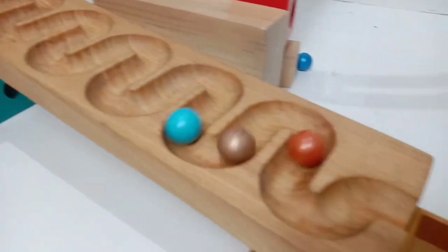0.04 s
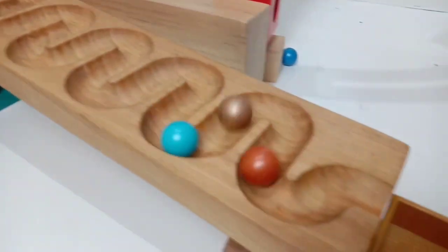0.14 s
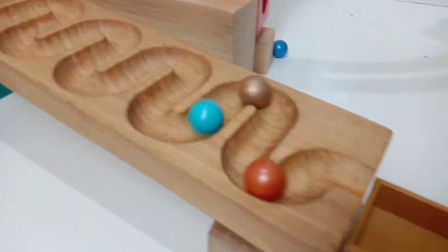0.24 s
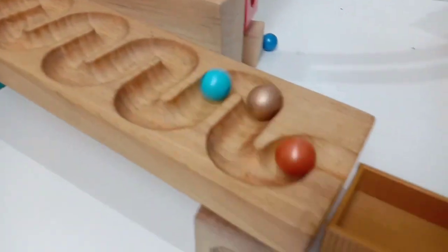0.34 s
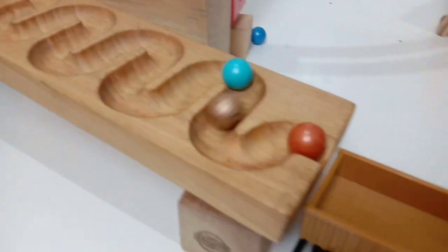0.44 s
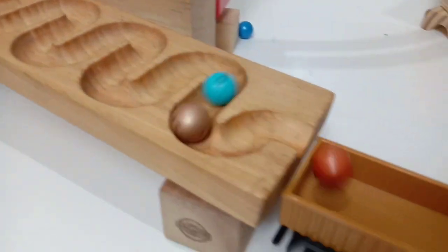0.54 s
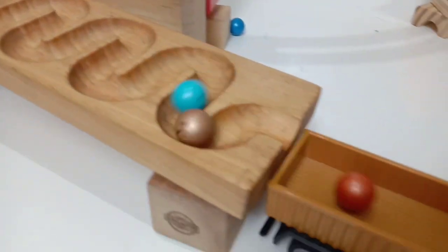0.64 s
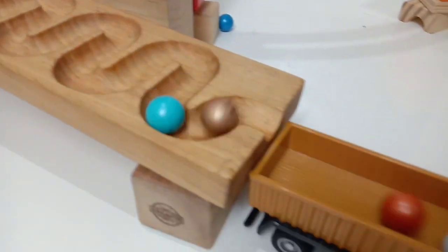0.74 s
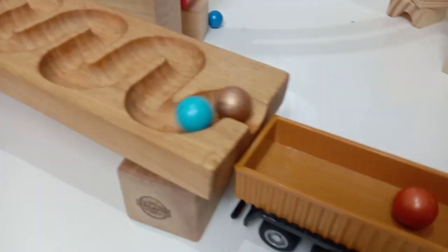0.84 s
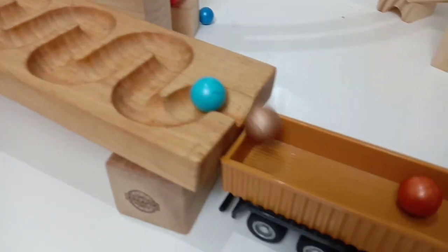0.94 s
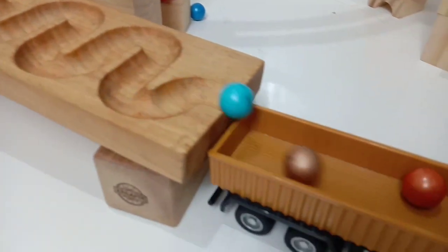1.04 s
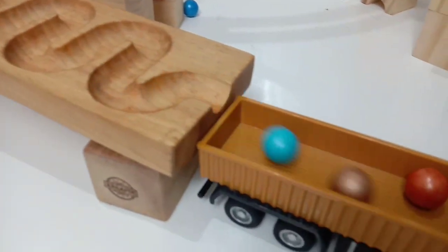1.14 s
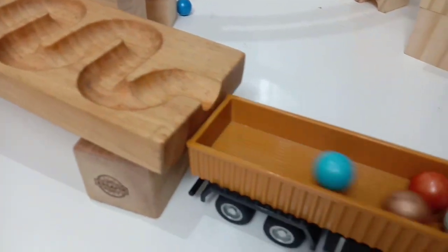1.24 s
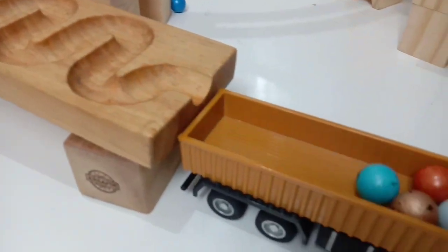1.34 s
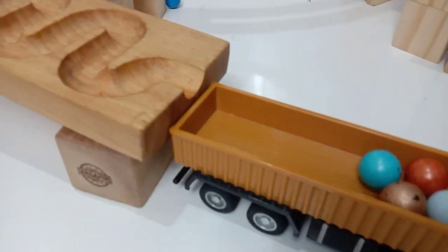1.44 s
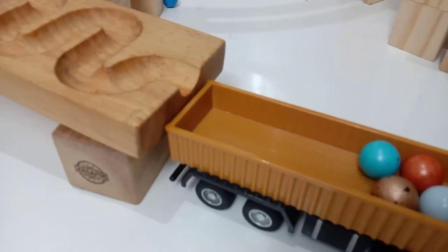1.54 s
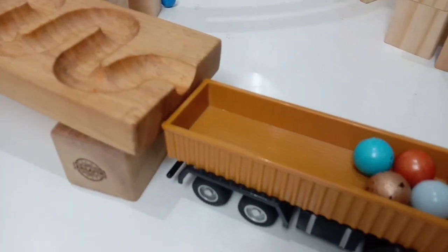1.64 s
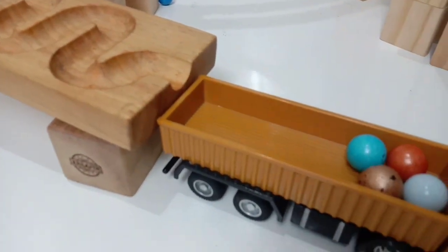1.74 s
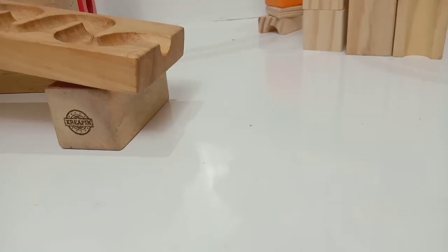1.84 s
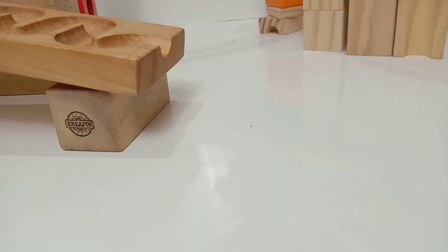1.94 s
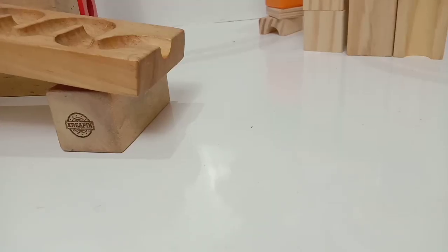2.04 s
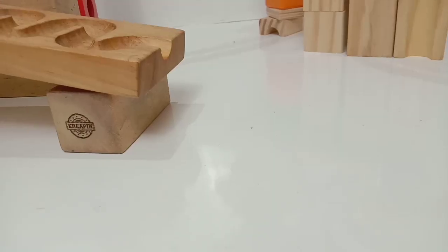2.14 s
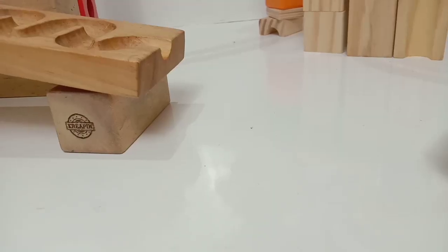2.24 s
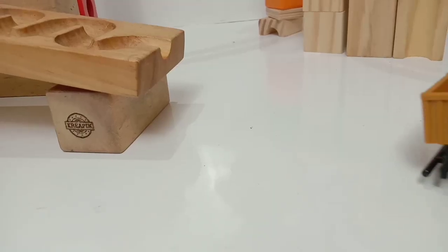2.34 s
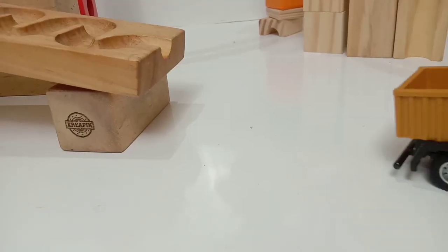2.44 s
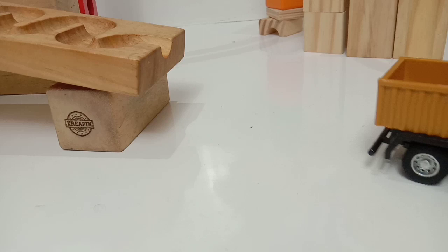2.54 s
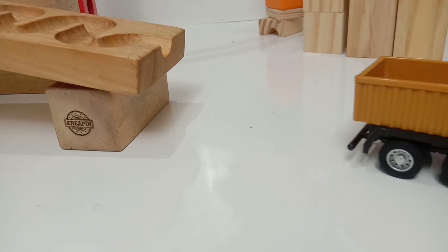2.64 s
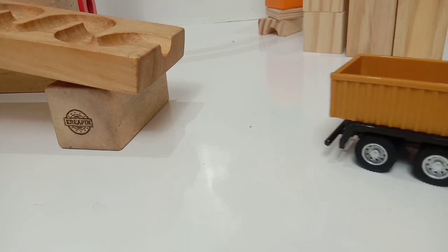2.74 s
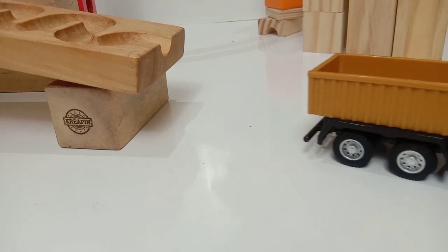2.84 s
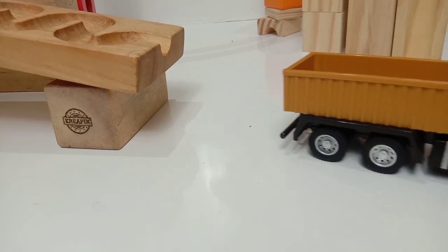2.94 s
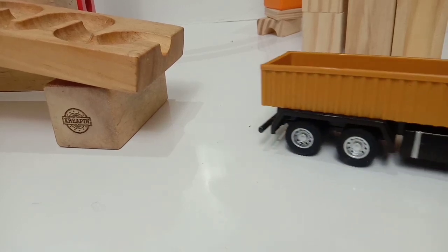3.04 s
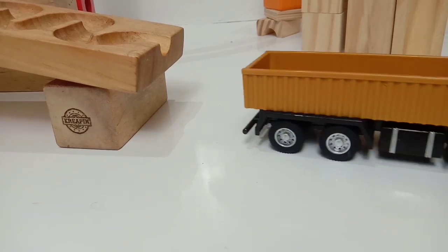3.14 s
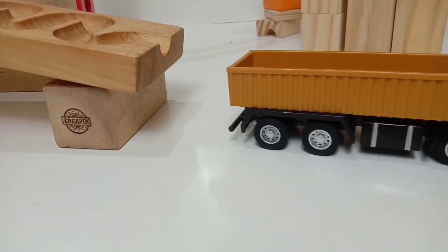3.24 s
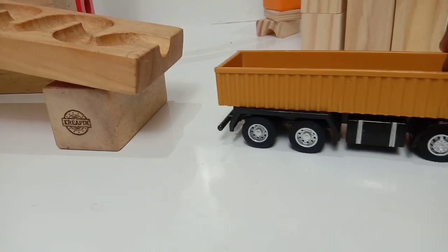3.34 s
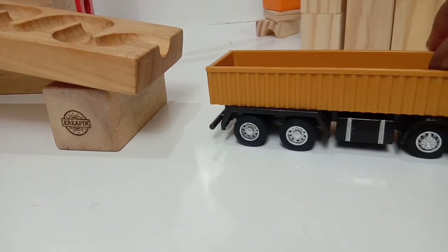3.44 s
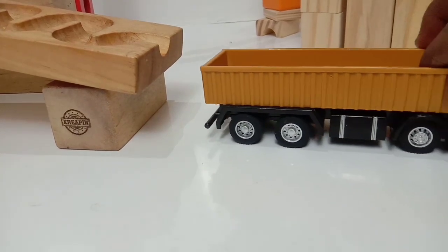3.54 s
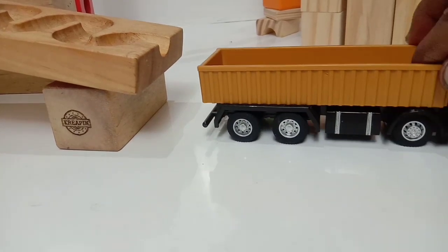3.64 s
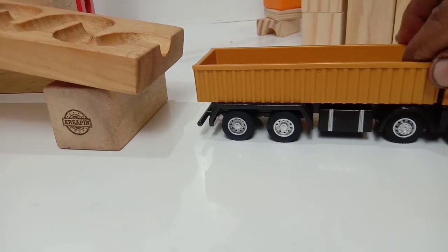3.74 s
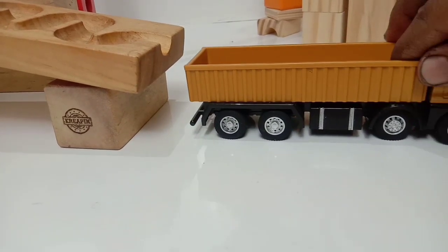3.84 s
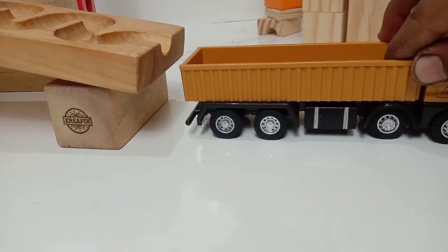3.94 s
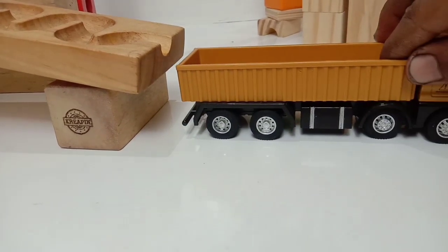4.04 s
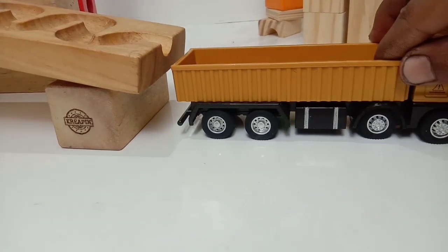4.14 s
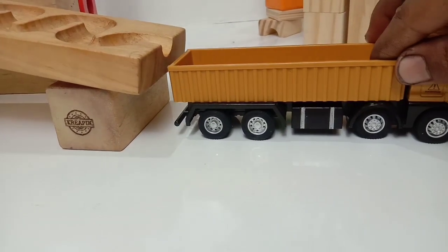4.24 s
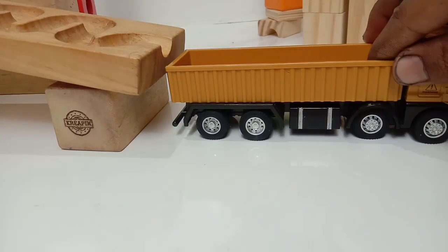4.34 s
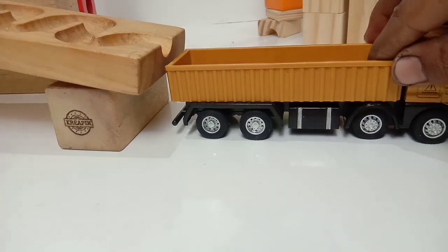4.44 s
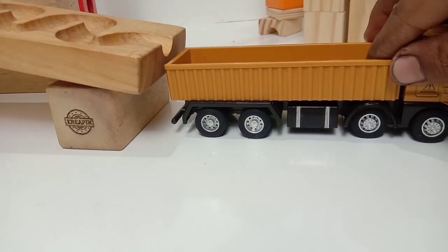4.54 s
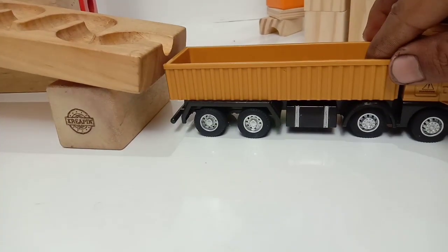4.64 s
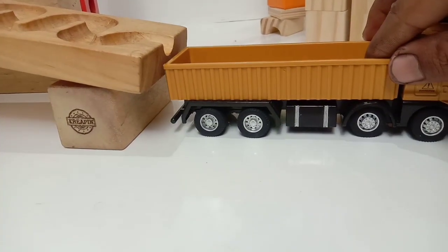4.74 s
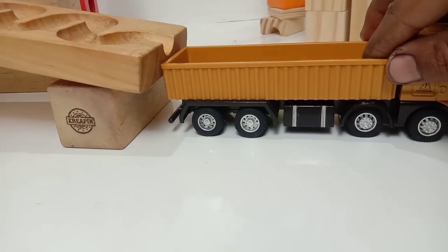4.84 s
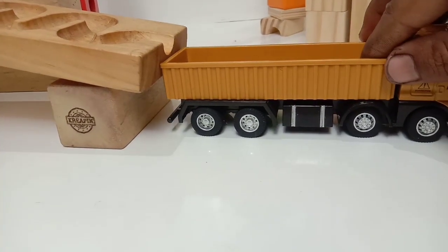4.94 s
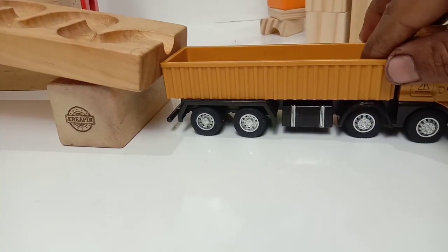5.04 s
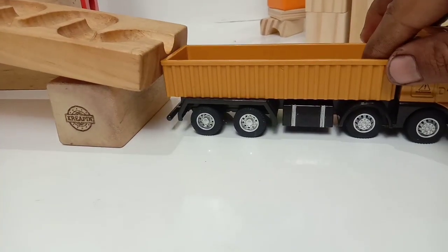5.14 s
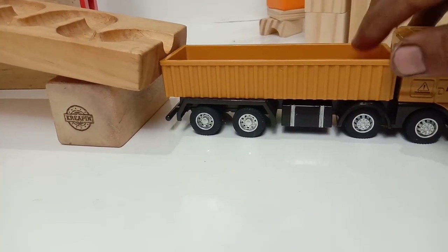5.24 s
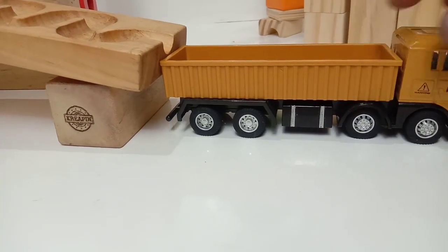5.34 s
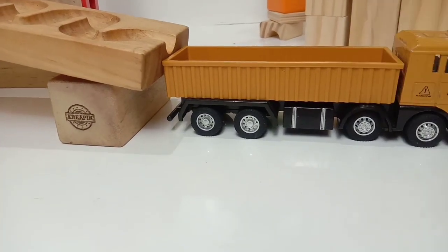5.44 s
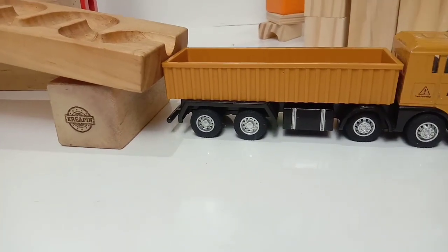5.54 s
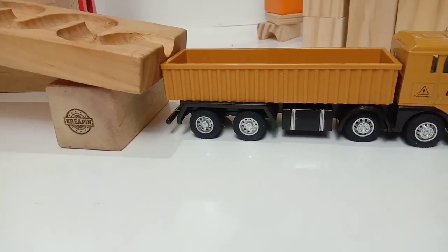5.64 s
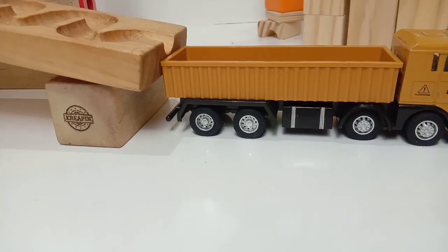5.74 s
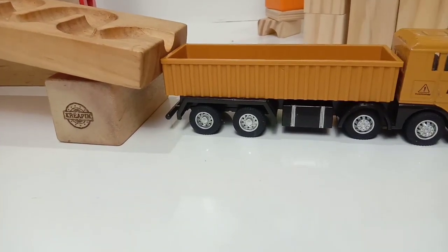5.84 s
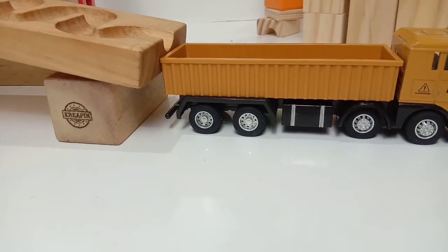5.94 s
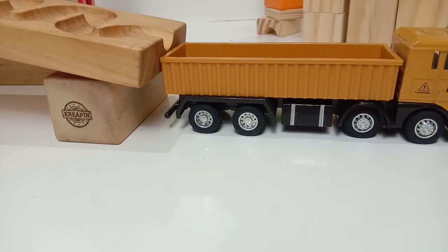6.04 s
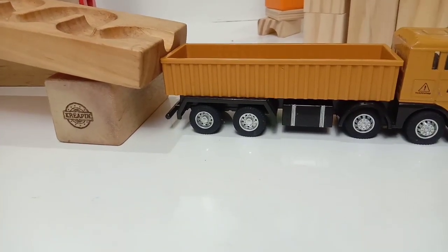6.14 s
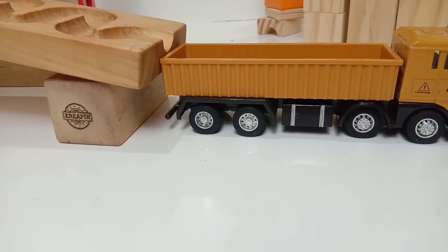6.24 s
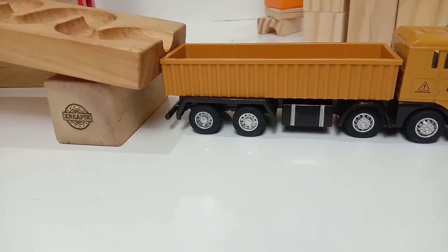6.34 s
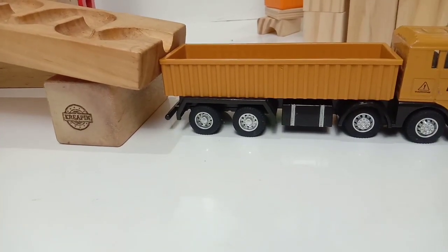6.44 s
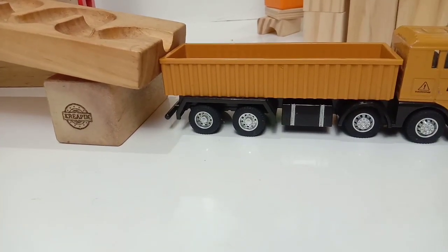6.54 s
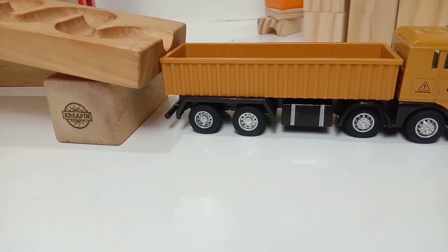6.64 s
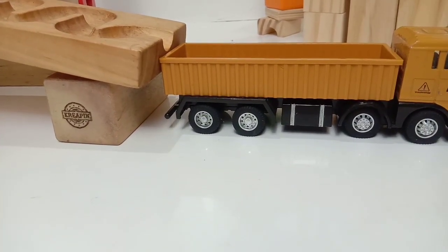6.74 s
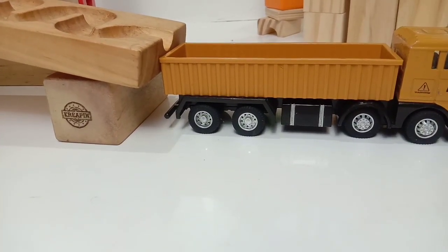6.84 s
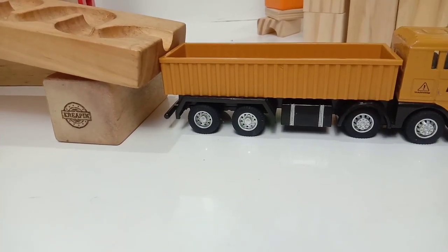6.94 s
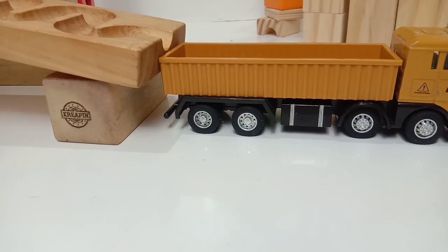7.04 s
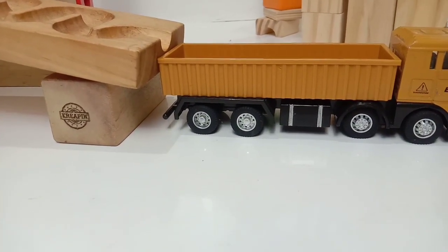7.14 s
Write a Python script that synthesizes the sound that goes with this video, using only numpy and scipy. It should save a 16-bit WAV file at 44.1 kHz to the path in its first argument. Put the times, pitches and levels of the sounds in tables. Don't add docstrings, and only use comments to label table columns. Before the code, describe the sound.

Close up in a small bare room, glass marbles rumble and knock down a grooved wooden track, then land with bright cracks in a plastic toy trailer and chatter along its bed. A short cut to silence follows. The empty toy truck is pushed over a hard table, axles rattling sharply, then sits with faint taps. Finally unseen marbles roll and clack together.

```python
import sys
import numpy as np
from scipy import signal
from scipy.fft import rfft, irfft, next_fast_len
from scipy.io import wavfile
from scipy.ndimage import map_coordinates

SR = 44100
rng = np.random.default_rng(int(sys.argv[2]) if len(sys.argv) > 2 else 0)


def transcribe(u):
    v = np.clip(np.atleast_2d(u).T, -1, 1)
    q = np.round(v * 32767).astype(np.int16)
    wavfile.write(sys.argv[1], SR, q)


def linear_from_db(decibels):
    return 10 ** (np.asarray(decibels, float) / 20)


N = 317520
SPAN = 16384

# f/Hz, density level/dB per Hz
AIR_SPECTRUM = [(15, -58), (25, -25), (177, -8), (214, -20.5), (399, -12.5), (445, -24), (687, -25),
                (1010, -22), (1360, -25), (1470, -28.5), (3510, -30), (15200, -45), (16500, -43)]
AIR_DB = -70.5
# f/Hz, t60/s
ROOM_T60 = [(150, 0.78), (1000, 0.29), (4000, 0.26), (8000, 0.23), (14000, 0.14)]

# f/Hz, width/Hz, level/dB
TABLE_MODES = [(86.7, 11, 0.5), (120, 7.3, 4.5), (181.2, 11, 6), (249.7, 31, -5.5), (57.74, 14, -22.5),
               (490, 63, -6.5)]
TRACK_MODES = [(279.3, 67, -5.5), (409, 23, 0), (512.8, 35, -8.5), (635.4, 120, -4), (740, 150, -2),
               (1240, 27, -0.5), (1560, 97, -1.5), (1900, 110, -10), (2860, 220, -11.5), (4150, 790, -24)]
TRAILER_MODES = [(402, 120, -14), (886, 240, -12), (1274, 160, 0.5), (1620, 620, -8), (2183, 330, -6)]
GLASS_MODES = [(2483, 380, 0.5), (2882, 1400, 0), (3600, 2000, -0.5), (4783, 710, 0.5), (4922, 220, 4),
               (5100, 430, -5), (5714, 270, -1), (6400, 240, 1.5), (7010, 600, 2), (7570, 980, 2.5),
               (8076, 360, -3), (8860, 1100, -19.5)]
# f/Hz, width/Hz, level/dB
SHEEN_MODES = [(9710, 610, 5), (10830, 390, 1), (11900, 910, -5.5), (13600, 3200, -18)]
# f/Hz, width/Hz, level/dB
PING_MODES = [(1240, 9.7, -13), (1650, 11, -0.5), (2200, 9.3, -2.5), (2885, 43, -12), (3505, 17, -5),
              (4530, 28, -4.5), (6156, 140, -0.5), (7120, 37, 3.5)]
# f/Hz, width/Hz, level/dB
AXLE_MODES = [(1240, 54, -1.5), (2700, 51, -7), (3650, 280, -9.5), (4500, 57, -2), (4370, 24, -4),
              (5170, 150, -2), (5960, 52, -4), (6340, 62, -10.5), (6760, 86, -5), (7800, 110, -8)]
# f/Hz, width/Hz, level/dB
SKID_MODES = [(4600, 160, -1.5), (6000, 250, 0), (7300, 260, 2.5), (8400, 770, -4), (9000, 180, -3.5),
              (9600, 330, -5), (11800, 200, -8), (14410, 900, -15.5)]
# f/Hz, width/Hz, level/dB
HOLLOW_MODE = (350, 15, -9)
# f/Hz, width/Hz, level/dB
PORT_MODE = (15250, 600, 11)
MARBLE_HZ, MARBLE_WIDTH_HZ = 6910, 370

# t/s, level/dB of each of the three modes, t60/s
TABLE_SWINGS = [(0.0, -28, -34, -28, 0.35), (0.29, -61, -52, -38.5, 1), (0.619, -34, -26, -35, 0.39),
                (0.988, -32, -29.5, -30.5, 0.69), (1.12, -44, -39, -35, 1), (1.302, -46, -47, -48, 0.41),
                (1.549, -55, -54.5, -66, 0.33), (1.93, -51.5, -52, -62, 1), (2.226, -43, -40, -52, 0.23),
                (2.365, -44, -48, -38, 0.74), (2.514, -41, -37.5, -50.5, 0.57), (2.719, -61, -50.5, -64, 1),
                (2.97, -59, -62, -50, 0.48), (3.132, -56, -46.5, -33.5, 0.37), (3.2, -48, -39.5, -55, 0.47),
                (5.251, -65.5, -58, -47, 0.38), (5.636, -48, -45, -43, 0.32),
                (5.7, -53.5, -51.5, -47, 0.33), (5.822, -61, -50.5, -65.5, 0.7),
                (6.85, -67.5, -60.5, -65.5, 0.61), (7.04, -66, -64, -57.5, 0.28)]
SWING_MODES_HZ = (84.7, 111.94, 178)
SWING_RISE_S = 0.015

# t/s, rumble level/dB, fade/dB per s, wood over rumble/dB
TABLE_JOLTS = [(1.97, -46.5, 86, -20), (2.25, -47, 100, -3), (2.39, -36.5, 120, 2.5), (2.54, -39, 118, 0),
               (2.76, -63, 20, -25), (3.172, -40, 125, -0.5), (3.74, -59.5, 70, -12),
               (4.2, -65, 67.5, -9.5), (4.89, -73, 142, 4), (5.288, -53.5, 169, -18),
               (5.651, -50.5, 55.5, -30), (6.2, -58.5, 7.5, -13.5), (6.87, -54, 19.5, -22)]
JOLT_RISE_DB_PER_S = 233.5
# t/s of greatest speed, rumble level/dB, chatter over rumble/dB
MARBLE_RUNS = [
    (0.0, -30.5, 8),
    (0.169, -48, 3),
    (0.33, -37, 3.5),
    (0.675, -33.5, 4),
    (1.03, -36.5, 9),
    (1.178, -32.5, 5.5),
    (1.361, -47, 10.5),
]
BED_RISE_DB_PER_S, BED_FADE_DB_PER_S, CHATTER_STEEPER = 147, 119.5, 1.3
# t/s, level/dB
GROOVE_EFFORT = [
    (0, -29.5),
    (.204, -37.5),
    (.36, -34.5),
    (.526, -49),
    (.676, -32.5),
    (.962, -46),
    (1.03, -39.5),
    (1.178, -43),
    (1.4, -55),
]
# t/s, level/dB
PUSH_EFFORT = [
    (1.98, -103),
    (2.09, -39.5),
    (2.19, -59),
    (2.34, -37.5),
    (2.67, -49.5),
    (3.17, -36.5),
    (3.29, -62),
    (3.74, -66),
    (3.97, -76),
]
# t/s, level/dB
UNSEEN_EFFORT = [
    (6.05, -90.5),
    (6.24, -76.5),
    (6.457, -42),
    (6.615, -39.5),
    (6.723, -54.5),
    (6.871, -47.5),
    (7.03, -76),
    (7.1, -100),
]
WHEELS_WOOD_DB, UNSEEN_WOOD_DB, REST_WOOD_DB, REST_TABLE_DB = -15, -2.5, -81.5, -66.5
WHEELS_CORNER_HZ = 7240

# t/s, level/dB
SKID_EFFORT = [
    (6.74, -93),
    (6.775, -68.5),
    (7.041, -55),
    (7.055, -69.5),
    (7.1, -83.5),
]
# t/s, peak level/dB, ringing f/Hz, t60/s
DULL_KNOCKS = [(0.051, -28, 1640, 0.19), (0.081, -19.5, 695, 0.03), (0.084, -20, 2750, .04),
               (0.227, -28, 740, .04), (0.327, -21.5, 1647, 0.046), (0.372, -18, 740, .06),
               (0.385, -30, 1610, .03), (0.486, -25, 740, 0.099), (4.916, -46, 1250, 0.022),
               (4.927, -44.5, 1150, .04), (5.086, -49.5, 1140, 0.13), (0.173, -25, 327, 0.5),
               (0.316, -16, 760, 0.26), (0.36, -16, 725, 0.13), (0.415, -14, 690, 0.076),
               (0.428, -10, 740, 0.059), (0.689, -17, 804, 0.029), (0.738, -35, 1650, 0.07),
               (0.768, -23, 665, 0.27), (0.798, -15.5, 710, 0.14), (0.867, -14, 763, 0.045),
               (0.893, -17, 740, 0.13), (1.522, -35.5, 414, 0.032), (1.70, -59, 489, 0.52),
               (2.211, -29.5, 1260, 0.18), (2.339, -27, 1520, 0.024), (3.688, -43.5, 390, 0.43),
               (3.917, -48, 1590, 0.074), (4.11, -62, 450, .3), (4.149, -59.5, 740, .3),
               (4.21, -61, 700, 0.21), (4.876, -44, 261, 0.098), (4.884, -41.5, 1213, 0.1),
               (5.271, -52, 1240, .04), (5.636, -30, 160, 0.15), (5.64, -39.5, 297, 0.24),
               (5.658, -46, 883, 0.053), (5.705, -36.5, 576, 0.077), (5.987, -49.5, 352, 0.099),
               (6.133, -46.5, 1290, 0.14), (6.154, -33, 1310, 0.18), (6.574, -33, 1290, 0.071),
               (7.004, -27.5, 302, 0.068), (7.006, -35.5, 582, .1), (7.03, -36, 219, 0.15)]

# t/s, peak level/dB, brightest mode f/Hz, knock level/dB re peak
TRAILER_TAPS = [
    (4.8686, -45, 4130, -5),
    (4.901, -38.5, 4180, 3),
    (5.1069, -47.5, 2200, -2.5),
    (5.277, -62.5, 4190, -2),
    (5.1887, -48.5, 2146, -14),
    (5.35, -58, 2090, -14.5),
    (6.1591, -31, 4340, 0),
]
HAND_CONTACTS = [
    (4.387, -60.5, 1884, -8),
    (4.488, -60, 5570, -15.5),
    (4.5539, -53, 3780, -6.5),
    (4.7617, -48, 7130, -3.5),
    (4.8683, -40, 7460, -8.5),
    (5.0939, -58, 2600, -6),
    (5.628, -47.5, 2180, -32),
    (5.6736, -47.5, 7200, -22),
]
TRUNDLE_CONTACTS = [(2.690, -40, 6000, -16), (2.7125, -59.5, 5180, -10), (2.9135, -48, 5270, -35),
                    (2.962, -41.5, 3700, -9), (3.0672, -41, 2100, -11), (2.7462, -37.5, 5500, -7.5),
                    (2.7677, -44, 3200, 1), (2.8566, -37, 3400, -2), (2.8814, -39.5, 5070, 0.5),
                    (2.9402, -40, 6750, -2), (2.9888, -40.5, 3570, -2), (3.0149, -30.5, 2050, -1),
                    (3.0886, -39, 2120, -18), (3.1206, -16.5, 7230, -6), (3.1382, -25.5, 6020, 9.5),
                    (3.1597, -24.5, 4160, 1.5), (3.1929, -28.5, 6440, 0), (3.2306, -33.5, 6700, 5),
                    (3.258, -28, 6950, -3), (3.5142, -42, 3390, 3.5), (3.5388, -35, 7500, -1),
                    (3.5514, -34.5, 3653, -4.5), (3.6005, -32, 3310, 0), (3.6095, -25.5, 3600, 1),
                    (3.754, -46, 6170, -28.5), (3.768, -28.5, 3560, -2.5)]
PUSH_BUMPS = [(1.924, -16, 3430, -14), (1.9515, -34.5, 4040, 0.5), (1.9574, -24, 5130, -7),
              (1.9799, -27.5, 3590, -3.5), (1.9904, -28, 4800, -16.5), (2.0153, -39.5, 4580, -3.5),
              (2.0351, -34.5, 4446, -12.5), (2.0685, -31.5, 8130, -23), (2.0929, -38.5, 3458, -13.5),
              (2.151, -36.5, 3700, -17), (2.1801, -27.5, 5620, -28.5), (2.218, -19.5, 7243, -11),
              (2.2199, -8, 6260, -8.5), (2.362, -12, 7800, -23.5), (2.3674, -15.5, 7390, -7),
              (2.3774, -17, 4680, -3), (2.397, -31, 5622, -11), (2.4061, -17.5, 3257, 0.5),
              (2.4697, -34, 3670, 3.5), (2.4975, -33, 2506, -14.5), (2.5114, -7, 7330, -4),
              (2.5451, -20, 4120, -5.5)]
MARBLE_CLACKS = [(6.2788, -36.5, 6200, 2.5), (6.2929, -22.5, 5100, 3.5), (6.318, -46.5, 2350, 19.5),
                 (6.3493, -20.5, 4600, -7), (6.3624, -24, 5960, -0.5), (6.3804, -18, 4600, -6.5),
                 (6.4358, -6.5, 5960, -16), (6.4461, -17.5, 6200, -8), (6.4677, -7.5, 5925, -11.5),
                 (6.4862, -6, 6930, -9), (6.5026, -10.5, 5675, -6), (6.537, -5, 6400, -14),
                 (6.5756, -20, 3302, -0.5), (6.616, -14, 7460, -13.5), (6.7072, -37, 2500, 0),
                 (6.7225, -36, 2300, -6), (6.797, -16.5, 5980, -2.5), (6.8075, -9.5, 6824, -6),
                 (6.8479, -24, 3270, -13), (6.8551, -20.5, 7540, -2.5), (6.8844, -32, 5630, -1.5),
                 (7.0055, -39.5, 7120, 4.5), (7.0438, -58.5, 7500, 7), (7.0825, -75.5, 6970, 0)]
STRAY_DROPS = [
    (0.001, -10.5, 3600, -17),
    (0.061, -23.5, 7100, -2.5),
    (0.2312, -27.5, 4400, -5.5),
    (0.4282, -35.5, 2687, 18),
    (0.7422, -32.5, 3804, -23),
    (0.898, -36, 2500, 13.5),
    (1.476, -35, 6950, -16),
    (1.5482, -29.5, 2950, -7),
]
BED_HOPS = [(0.2745, -11.5, 4150, -13), (0.321, -22, 4300, -10), (0.6385, -13.5, 3650, -13.5),
            (0.6534, -12, 6060, -13), (0.6643, -19, 3600, -8), (0.672, -19.5, 6420, -8.5),
            (0.7694, -19.5, 7200, -14), (0.9853, -15, 5650, -15), (1.0134, -12, 7200, -9),
            (1.0195, -15, 3600, -6), (1.040, -19.5, 2600, -6.5), (1.0605, -12, 7200, -17.5),
            (1.1284, -11.5, 3650, -11), (1.1374, -14.5, 7050, -9), (1.1496, -15.5, 4300, -8.5),
            (1.158, -16, 3500, -8.5), (1.170, -19.5, 4200, -10.5), (1.184, -23, 4070, -8),
            (1.197, -25.5, 4410, -12.5), (1.2837, -13, 7170, -12), (1.3222, -12, 4000, -19.5),
            (1.3357, -19, 3890, -19.5), (1.3522, -19.5, 4000, -20.5)]
# t/s, peak level/dB, plastic ring f/Hz, glass over it/dB, rattle t60/s
TRAILER_LANDINGS = [(0.2720, -7.5, 3496, 9.5, 0.057), (0.5370, -6.5, 4370, -12, 0.038),
                    (0.5788, -1, 5630, -2.5, 0.011), (0.6234, -11.5, 3634, 1, 0.16),
                    (0.7572, -8, 5900, 4.5, 0.023), (0.7843, -15.5, 4435, 1, 0.055),
                    (0.9238, -8.5, 4426, -10.5, 0.043), (0.9634, -4, 5800, -0.5, 0.017),
                    (1.0088, -12.5, 4310, 0, 0.091), (1.0282, -13.5, 4000, 5, 0.036),
                    (1.058, -5.5, 4370, -6, .025), (1.0970, -2.5, 4600, -2, 0.023),
                    (1.2691, -13, 5850, -3.5, 0.068), (1.2732, -11, 4156, 5, 0.052),
                    (1.3093, -6.5, 4145, 8, 0.064)]
SHEEN_DB_PER_OCTAVE = 3.5
SHEEN_DB_PER_DB, CORNER_DB_PER_DB = 0.45, 0.56
KNOCK_DB, KNOCK_DB_PER_OCTAVE = -17.5, 1

# start t/s, end t/s
SCENE_CHANGE = (1.802, 1.921)
# end t/s, length/s, depth level/dB
GAIN_SAGS = [
    (0.58, 0.017, -11.5),
    (0.964, 0.02, -19.5),
    (1.099, 0.024, -18),
    (6.451, 0.021, 1),
]
TOP_HZ = 16800


def unit(x):
    return x / np.sqrt(np.mean(x ** 2) + 1e-20)


def along(points, hz):
    f, v = np.transpose(points)
    return np.interp(np.log(hz + 1), np.log(f + 1), v)


def filtered(x, response):
    m = next_fast_len(len(x) + SR // 4)
    return irfft(rfft(x, m) * response(np.fft.rfftfreq(m, 1 / SR)), m)[:len(x)]


def body(modes):
    def response(f):
        total = 0
        for k, (centre, width, db) in enumerate(sorted(modes)):
            damping = 1j * f * width
            total = total + (-1) ** k * linear_from_db(db) * damping / (centre * centre - f * f + damping)
        return total
    return response


def soft(hz, corner_hz):
    return 1 / (1 + 1j * hz / corner_hz) ** 3


def grit(share, spike_db, bump_db):
    bumps = (rng.random(N) < share) * linear_from_db(spike_db * np.minimum(rng.exponential(size=N), 2))
    pressure = map_coordinates(rng.standard_normal(N // 500 + 4), [np.arange(N) / 500])
    return rng.standard_normal(N) * (1 + bumps) * linear_from_db(bump_db * pressure)


def swell(s, db, rise_db_per_s, fade_db_per_s):
    late = np.arange(N) / SR - s
    return linear_from_db(db + np.where(late < 0, rise_db_per_s, -fade_db_per_s) * late)


def effort(points):
    return linear_from_db(np.interp(np.arange(N) / SR, *np.transpose(points), left=-120, right=-120))


def together(*gains):
    return np.sqrt(sum(g ** 2 for g in gains))


def tails(count):
    hz, t, z = signal.stft(rng.standard_normal((count, SPAN - 2048)), SR, nperseg=256)
    t60 = np.clip(along(ROOM_T60, hz), .05, 1)
    answer = signal.istft(z * linear_from_db(-60 * t / t60[:, None]), SR, nperseg=256)[1]
    answer = answer / np.linalg.norm(answer, axis=1, keepdims=True)
    return np.pad(answer, ((0, 0), (250, 0)))


def strike(out_len, s, burst, room, parts, wet_db):
    force = rfft(burst, SPAN)
    colour = sum(linear_from_db(db) * part / np.max(np.abs(irfft(force * part))) for part, db in parts)
    reverberant = linear_from_db(wet_db) * np.linalg.norm(burst) * rfft(room, SPAN)
    sound = irfft(colour * (force + reverberant))
    start = round(s * SR)
    return start, sound[:min(out_len - start, SPAN - 512)]


def air():
    return linear_from_db(AIR_DB) * unit(filtered(rng.standard_normal(N), lambda hz: linear_from_db(along(AIR_SPECTRUM, hz))))


def table_swings():
    out, t = np.zeros(N + SR), np.arange(SR) / SR
    all_phases = rng.random((len(TABLE_SWINGS), len(SWING_MODES_HZ)))
    for (s, *levels, t60), phases in zip(TABLE_SWINGS, all_phases):
        tones = 0
        for hz, db, phase in zip(SWING_MODES_HZ, levels, phases):
            tones = tones + linear_from_db(db) * np.sin(2 * np.pi * (hz * t + phase))
        out[round(s * SR):][:SR] += tones * linear_from_db(-60 * t / t60) * (1 - np.exp(-t / SWING_RISE_S))
    return out[:N]


def chatter_response(hz):
    hard = body(TRAILER_MODES[2:] + GLASS_MODES)(hz)
    hard = hard + body([(3900, 1300, 1.5)])(hz) ** 2 + body([(2100, 900, -1)])(hz)
    return (hard + linear_from_db(-28.5) * body(SHEEN_MODES)(hz)) * soft(hz, corner_hz=11900)


def axle_response(hz):
    return (body(AXLE_MODES)(hz) + linear_from_db(-8) * body(GLASS_MODES)(hz)) * soft(hz, WHEELS_CORNER_HZ)


def rolling():
    rise, fade = BED_RISE_DB_PER_S, BED_FADE_DB_PER_S
    wheels, unseen = effort(PUSH_EFFORT), effort(UNSEEN_EFFORT)
    jolts = [swell(s, db, JOLT_RISE_DB_PER_S, fade_db) for s, db, fade_db, _ in TABLE_JOLTS]
    bed_rumbles = [swell(s, db, rise, fade) for s, db, _ in MARBLE_RUNS]
    bed_chatters = [swell(s, db + over_db, CHATTER_STEEPER * rise, CHATTER_STEEPER * fade)
                    for s, db, over_db in MARBLE_RUNS]
    wood_jolts = [linear_from_db(row[-1]) * jolt for row, jolt in zip(TABLE_JOLTS, jolts)]

    rumble = together(linear_from_db(REST_TABLE_DB), *jolts, *bed_rumbles)
    wood = together(linear_from_db(REST_WOOD_DB), effort(GROOVE_EFFORT), linear_from_db(WHEELS_WOOD_DB) * wheels,
                    linear_from_db(UNSEEN_WOOD_DB) * unseen, *wood_jolts)
    shake = together(unseen, *bed_chatters)

    table = unit(filtered(grit(share=0.00044, spike_db=4.0, bump_db=-2.0),
                          lambda hz: body(TABLE_MODES)(hz) * soft(hz, corner_hz=626.0)))
    track = unit(filtered(grit(share=0.0026, spike_db=8.5, bump_db=3.0),
                          lambda hz: body(TRACK_MODES)(hz) * soft(hz, corner_hz=3600)))
    hollow_hz, hollow_width_hz, hollow_db = HOLLOW_MODE
    hum = unit(filtered(rng.standard_normal(N), body([(hollow_hz, hollow_width_hz, 0)])))
    chatter = unit(filtered(grit(share=0.0037, spike_db=6.5, bump_db=-0.5), chatter_response))
    axles = unit(filtered(grit(share=0.0011, spike_db=14.5, bump_db=5.5), axle_response))

    low = linear_from_db(-3) * (rumble * table + wood * track)
    hard = linear_from_db(-4.5) * (shake * chatter + wheels * axles)
    return low + hard + linear_from_db(hollow_db) * unseen * hum


def skid():
    level_db = np.interp(np.arange(N) / SR, *np.transpose(SKID_EFFORT))
    friction = grit(share=.002, spike_db=8.5, bump_db=-3.0)
    return linear_from_db(level_db) * unit(filtered(friction, lambda hz: body(SKID_MODES)(hz) ** 2))


def dull_knocks():
    out, t, hz = np.zeros(N), np.arange(SR // 8) / SR, np.fft.rfftfreq(SPAN, 1 / SR)
    wood, table = linear_from_db(-1.0) * body(TRACK_MODES)(hz), linear_from_db(-10.5) * body(TABLE_MODES)(hz)
    count = len(DULL_KNOCKS)
    noises = rng.standard_normal((count, len(t)))
    for (s, db, ring_hz, t60), noise, room in zip(DULL_KNOCKS, noises, tails(count)):
        burst = noise * linear_from_db(-60 * t / np.clip(t60, .004, .4)) + 12 * (t == 0)
        heavy = (300 / ring_hz) ** 2
        ring = wood + heavy * table + body([(ring_hz, 95, 3), (1.01 * ring_hz, 50, 1)])(hz)
        ring = ring * soft(hz, corner_hz=4.5 * ring_hz)
        start, sound = strike(N, s, burst, room, [(ring, db - 3.0)], wet_db=-6.5)
        out[start:start + len(sound)] += sound
    return out


def contacts(table, ring, usual_db, ping_db, wet_db, knock_trim_db, sheen_trim_db,
             sheen_slope=SHEEN_DB_PER_DB):
    out, t, hz = np.zeros(N), np.arange(SR // 8) / SR, np.fft.rfftfreq(SPAN, 1 / SR)
    modes = np.array([(-1) ** k * body([mode])(hz)
                      for kind in (GLASS_MODES, PING_MODES) for k, mode in enumerate(kind)])
    pings = np.arange(len(modes)) >= len(GLASS_MODES)
    plastic = body(TRAILER_MODES)(hz) * soft(hz, corner_hz=3700)
    sheen = body(SHEEN_MODES)(hz)
    noises = rng.standard_normal((len(table), len(t)))
    strengths = rng.standard_normal((len(table), len(modes)))
    for row, noise, strength, room in zip(table, noises, strengths, tails(len(table))):
        s, db, top_hz, knock_db, t60, *glass = row
        burst = noise * linear_from_db(-60 * t / np.clip(t60, .004, .3))
        burst = burst + 7 * (t == 0)
        burst = burst + 0.035 * np.pad(burst, (170, 0))[:len(t)]

        mode_db = np.where(pings, ping_db + 3.1 * strength, 1.3 * strength)
        hard = linear_from_db(mode_db) @ modes + body([(top_hz, *ring)])(hz)
        for glass_db in glass:
            hard = hard + body([(MARBLE_HZ, MARBLE_WIDTH_HZ, ring[1] + glass_db)])(hz)
        over_db = db - usual_db
        hard = hard * soft(hz, corner_hz=3 * top_hz * linear_from_db(CORNER_DB_PER_DB * over_db))
        sheen_db = SHEEN_DB_PER_OCTAVE * np.log2(top_hz / 5000) + sheen_slope * over_db

        parts = [(hard, db), (plastic, db + knock_db + knock_trim_db),
                 (sheen, db + sheen_db + sheen_trim_db)]
        start, sound = strike(N, s, burst, room, parts, wet_db)
        out[start:start + len(sound)] += sound
    return out


def lasting(table, t60):
    return [(*row, t60) for row in table]


def taps():
    return contacts(lasting(TRAILER_TAPS, t60=0.028), (150, 14), usual_db=-37.0, ping_db=7,
                    wet_db=-10.0, knock_trim_db=2.0, sheen_trim_db=-49.5)


def handling():
    return contacts(lasting(HAND_CONTACTS, t60=0.05), (140, 11), usual_db=-51, ping_db=1.5,
                    wet_db=-10.5, knock_trim_db=3.5, sheen_trim_db=-14.5)


def trundle():
    return contacts(lasting(TRUNDLE_CONTACTS, t60=0.055), (350, 2.5), usual_db=-33.0, ping_db=2.5,
                    wet_db=-10.0, knock_trim_db=-1.5, sheen_trim_db=-33.5)


def bumps():
    return contacts(lasting(PUSH_BUMPS, t60=0.029), (350, 2.5), usual_db=-24.5, ping_db=-3.0,
                    wet_db=-8.0, knock_trim_db=2.0, sheen_trim_db=-23.5, sheen_slope=.15)


def clacks():
    return contacts(lasting(MARBLE_CLACKS, t60=0.024), (200, 5), usual_db=-21.5, ping_db=-6.0,
                    wet_db=-6.0, knock_trim_db=2.0, sheen_trim_db=-26.0)


def drops():
    return contacts(lasting(STRAY_DROPS, t60=0.043), (900, 5), usual_db=-22.5, ping_db=5.5,
                    wet_db=-7.0, knock_trim_db=-1.0, sheen_trim_db=-36.0)


def hops():
    table = [(s, db - 3.0, *rest) for s, db, *rest in BED_HOPS]
    return contacts(lasting(table, t60=0.015), (400, 8), usual_db=-18.5, ping_db=0.0,
                    wet_db=-1, knock_trim_db=-5.5, sheen_trim_db=-38.5)


def landings():
    table = []
    for s, db, hz, glass_db, t60 in TRAILER_LANDINGS:
        knock_db = KNOCK_DB + KNOCK_DB_PER_OCTAVE * np.log2(t60 / .04)
        table.append((s, db, hz, knock_db, t60, glass_db))
    return contacts(table, (500, 12), usual_db=-5.0, ping_db=4.0,
                    wet_db=-7.0, knock_trim_db=-2.0, sheen_trim_db=-30)


def scene():
    background = air() + table_swings() + rolling() + skid() + dull_knocks()
    trailer = taps() + handling() + trundle() + bumps()
    marbles = clacks() + drops() + hops() + landings()
    return (background + trailer + marbles)[None]


def low_pass(x):
    return signal.sosfilt(signal.butter(12, 16790, fs=SR, output="sos"), x)


def record(dry):
    t = np.arange(N) / SR
    start, stop = SCENE_CHANGE
    gain_db = np.where((t > start) & (t < stop), -75 + 450 * (t - start), 0)
    for end, length, depth_db in GAIN_SAGS:
        gain_db = gain_db + depth_db * np.clip(1 - (end - t) / length, 0, 1) * (t < end)

    def microphone(hz):
        return (1 + body([PORT_MODE])(hz)) * (hz < TOP_HZ) * linear_from_db(-30 * (hz > 15550))

    mix = filtered(dry[0] * linear_from_db(gain_db), microphone)
    return low_pass(mix[None])


dry = scene()
out = record(dry)
transcribe(out)
```